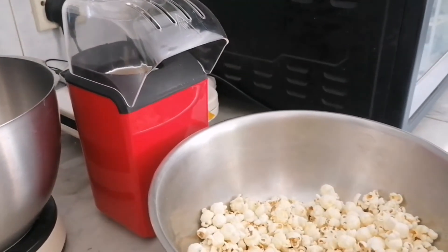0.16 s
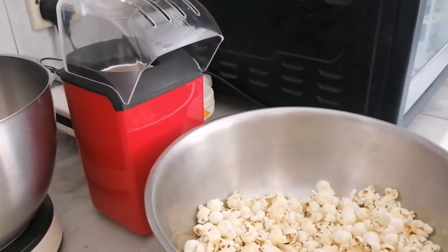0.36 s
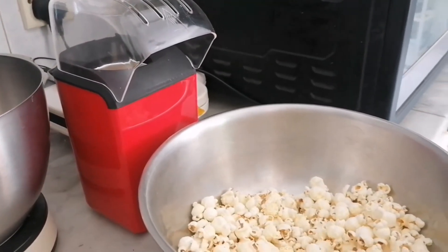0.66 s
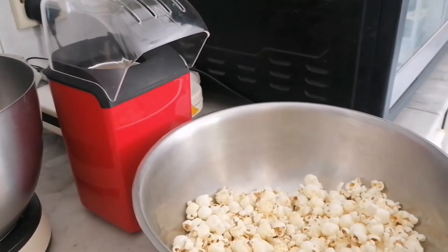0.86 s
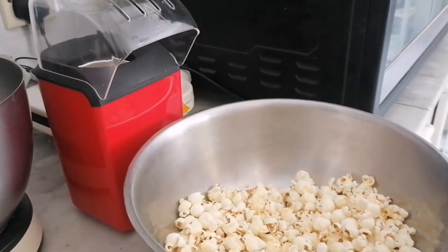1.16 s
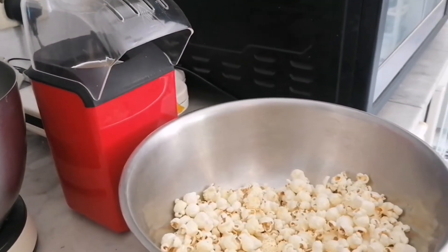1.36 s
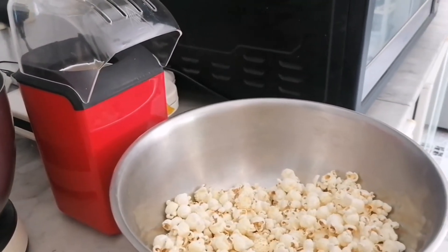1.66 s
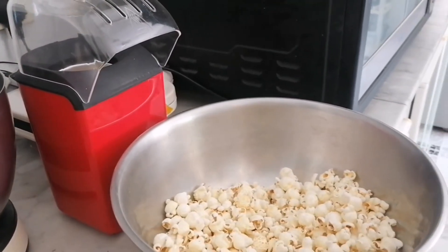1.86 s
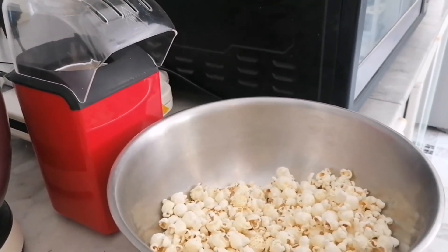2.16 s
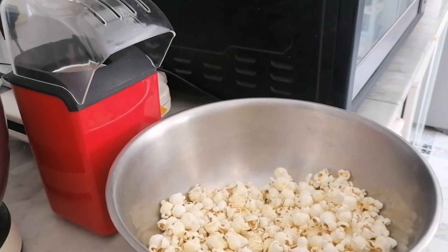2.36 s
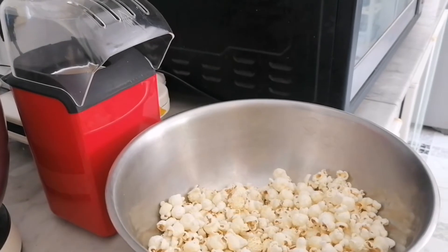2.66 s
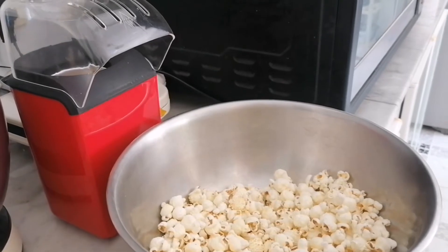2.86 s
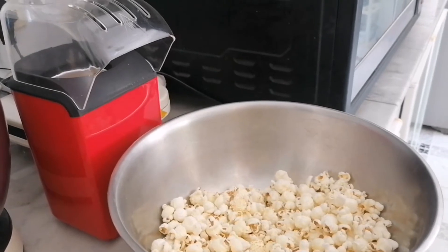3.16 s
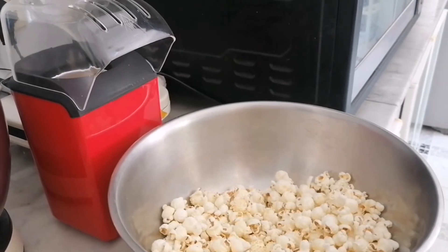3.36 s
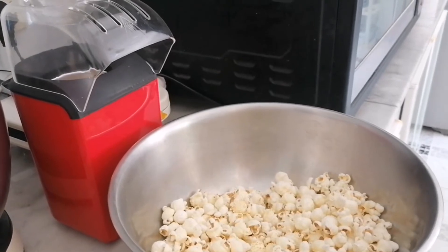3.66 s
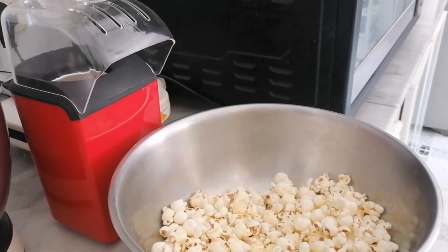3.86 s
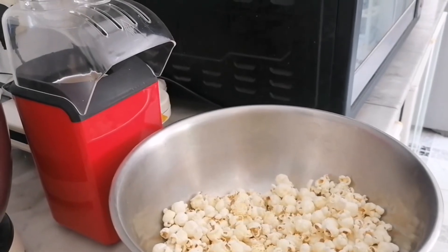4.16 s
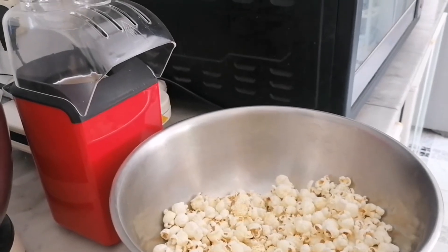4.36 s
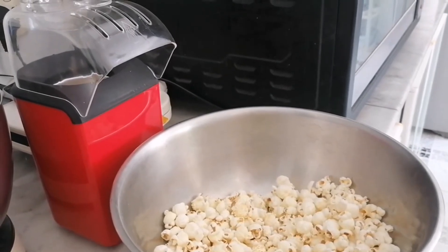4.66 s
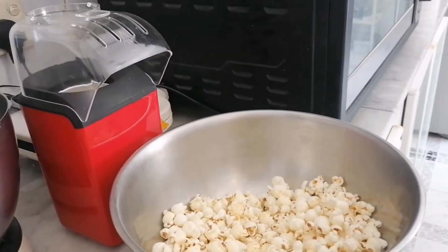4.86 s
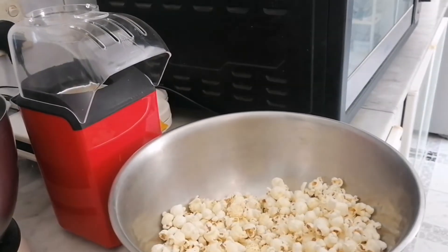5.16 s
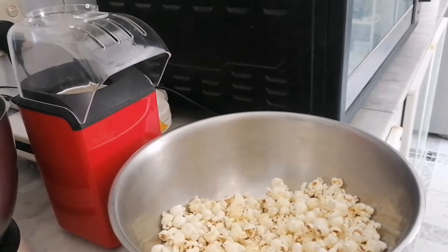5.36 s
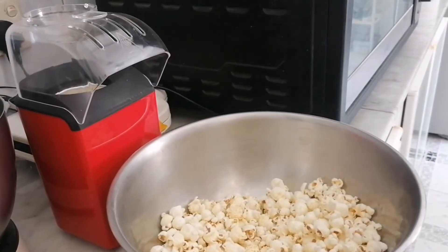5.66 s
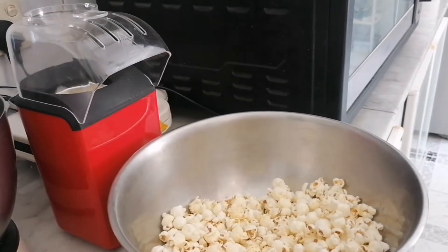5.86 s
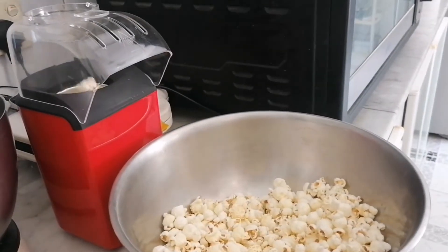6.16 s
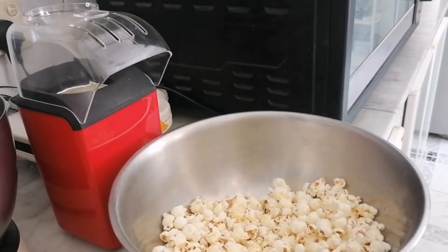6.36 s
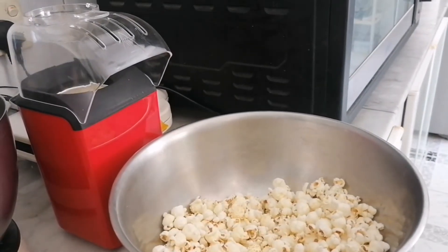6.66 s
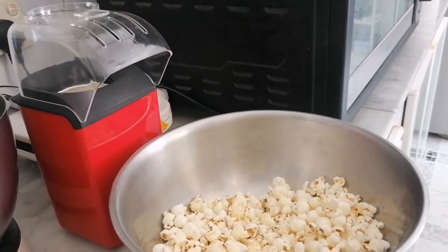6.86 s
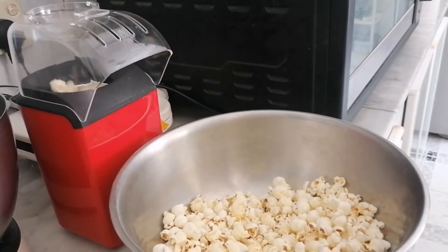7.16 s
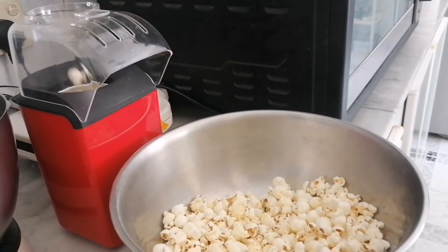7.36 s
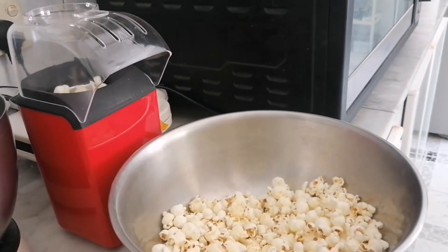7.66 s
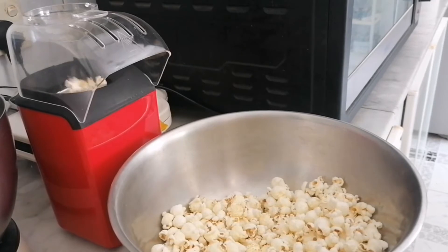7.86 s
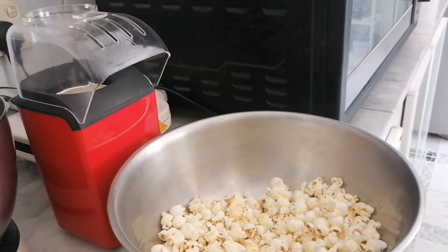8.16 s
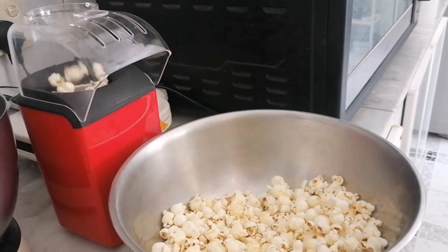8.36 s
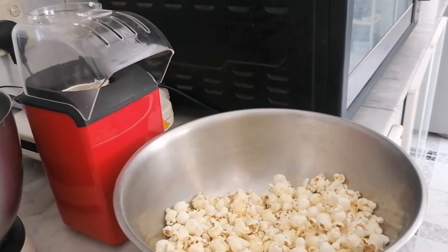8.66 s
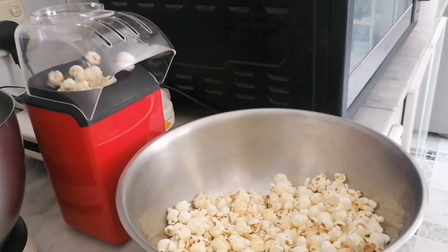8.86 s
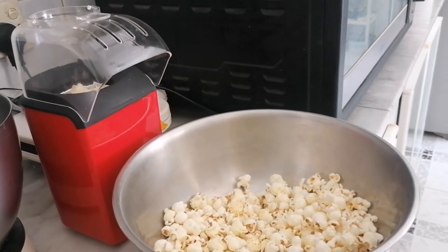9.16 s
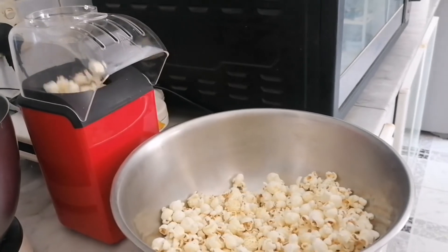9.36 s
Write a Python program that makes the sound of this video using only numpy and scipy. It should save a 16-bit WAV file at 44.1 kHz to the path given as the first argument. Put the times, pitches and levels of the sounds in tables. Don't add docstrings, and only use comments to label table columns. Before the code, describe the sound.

A hot-air popcorn maker roars and hums steadily, drops out briefly midway, then returns with irregular sharp kernel cracks under its plastic hood.

```python
import sys
import numpy as np
from scipy import signal
from scipy.io import wavfile
from scipy.ndimage import uniform_filter1d

SR = 44100
rng = np.random.default_rng(int(sys.argv[2]) if len(sys.argv) > 2 else 0)


def log_audio(samples):
    frames = np.atleast_2d(samples).T
    limited = np.clip(frames, -1, 1)
    pcm = np.round(limited * 32767).astype(np.int16)
    wavfile.write(sys.argv[1], SR, pcm)


def natural_amplitude(level_db):
    exponent = np.asarray(level_db, float) / 20
    return 10 ** exponent


N = 419832
TIME = np.arange(N) / SR
CUT_START_S, CUT_END_S = 4.673, 5.0185
CUT_MID_S = (CUT_START_S + CUT_END_S) / 2


def evened(x):
    return x / np.sqrt(np.mean(x ** 2) + 1e-20)


def read(points, hz):
    f, *columns = np.transpose(points)
    return np.array([np.interp(np.log(hz + 1), np.log(f + 1), c) for c in columns])


def curves(rows):
    s, *columns = np.transpose(rows)
    return np.array([np.interp(TIME, s, c) for c in columns])


def drift(top_hz, t, count):
    hz = np.geomspace(top_hz / 20, top_hz, 12)
    phase_turns = rng.random((count, 12, 1))
    waves = np.sin(2 * np.pi * (hz[:, None] * t + phase_turns)) / np.sqrt(hz)[:, None]
    return evened(waves.sum(1))


def coloured(x, points):
    hz = abs(np.fft.fftfreq(2048, 1 / SR))
    log_gain = np.log(natural_amplitude(read(points, hz)[0]))
    taps = np.fft.ifft(np.exp(np.conj(signal.hilbert(log_gain)))).real[:1024]
    return signal.oaconvolve(x, taps[None] / np.linalg.norm(taps), axes=1)[:, :N]


# f/Hz, left level/dB per Hz, right level/dB per Hz
AIR_ROAR = [(25.3, -87.5, -85.5), (99.5, -82, -82), (169, -74, -76.5), (290, -67, -68.5), (575, -57, -62.5),
            (1075, -63, -65), (1260, -68, -64.5), (2250, -70, -65), (3340, -68.5, -67), (3970, -73, -72),
            (5250, -72.5, -63), (7260, -72, -70.5), (8900, -72, -76), (13900, -84.5, -87)]
# f/Hz, width/Hz, left, right gain/dB before cut, left, right after
HOUSING_MODES = [(44.5, 30, 12.5, 10.5, 3, 2), (394, 29, 2.5, 4, 1.5, 1.5), (1039, 92, 6, 4.5, 4, 8.5),
                 (1170, 90, 2, -4, -1, -7), (1500, 300, 3, 2, 1, -2), (1735, 300, 5, 3.5, 2, 2),
                 (1930, 110, -2, -3, 3, -1), (2130, 120, -3, -2, 0, 0), (2700, 110, -1, -4, 0, 0),
                 (3043, 200, 3, 3.5, 4, 6.5), (3700, 300, -1, 2, -2.5, -1), (3950, 300, -1.5, -2, 1.5, -1),
                 (4450, 500, -1.5, 0, 2, 1.5), (5100, 500, 5.5, 0, 0, 0), (5280, 250, 0, -1.5, 5, 1.5),
                 (5550, 300, 1, 3, -2, -1), (5880, 380, 5, 9, -2, 2.5), (6524, 960, 3.5, 9, 0, 8),
                 (7900, 400, 5, -2, -2, 0), (8500, 700, 0, -8, 0, 3.5), (9200, 950, 9.5, -4, 4, 3),
                 (9750, 400, 4.5, -2, 3, 1), (10340, 1000, 8, 2.5, 3, 4), (10700, 600, 2, 0, -4, -2),
                 (11250, 600, 2, -4, 0, -1), (12200, 1600, 4.5, 4, 1.5, -1), (14750, 1000, 2, 6, 1, 7)]
# f/Hz, left gain/dB, right gain/dB
PHONE_MOVED = [(60, 6.5, 7), (198, -1, -2.5), (400, -4, 2), (1000, -1.5, 0), (2880, -0.5, 0.5),
               (5830, 4, 0.5), (8400, 1, -11.5), (14000, -0.5, -1)]
# f/Hz, likeness/0-1, lead of left port/rad
PORT_LIKENESS = [(40, .93, 0), (150, .86, 0), (254, .9, .19), (400, .8, .35), (640, .7, 1.4), (890, .5, .6),
                 (1140, .6, 1.9), (1400, .55, 1.9), (1700, .5, 2.5), (1850, .9, 3.1), (1920, .9, 3.2),
                 (2010, .3, 3.4), (2150, .12, 4.4), (2420, .5, 5.9), (2700, .3, 8.4), (3700, .2, 6.1),
                 (5100, .4, 5.5), (6000, .45, 9.1), (7500, .1, 11.5)]


def air(patchy_db=1.2, swell_db=0.5, ripple_db=1.1, edge_hz=15140):
    hz, t, (left, other) = signal.stft(rng.standard_normal((2, N)), SR, nperseg=2048, noverlap=1536)
    same, lead_rad = read(PORT_LIKENESS, hz)[:, :, None]
    same = np.clip(same, 0, 1)
    right = same * np.exp(-1j * lead_rad) * left + np.sqrt(1 - same ** 2) * other
    z = np.array([left, right])

    level_db = np.tile(read(AIR_ROAR, hz), (2, 1))
    level_db[2:] += read(PHONE_MOVED, hz)
    for centre_hz, width_hz, *boost_db in HOUSING_MODES:
        level_db += np.outer(boost_db, np.exp(-(2 * (hz - centre_hz) / width_hz) ** 2))
    before = t < CUT_MID_S
    level_db = np.where(before, level_db[:2, :, None], level_db[2:, :, None])
    level_db += 0.6 * np.outer(hz < 480, (t - 2.6) * before)

    patches = uniform_filter1d(rng.standard_normal(left.shape), 8, 0)
    patches = evened(uniform_filter1d(patches, 40, 1))
    ripple = uniform_filter1d(rng.standard_normal(z.shape), size=400, axis=2)
    level_db += ripple_db * evened(uniform_filter1d(ripple, size=3, axis=1))
    level_db = level_db + patchy_db * patches + swell_db * drift(6., t, count=1)
    z *= natural_amplitude(level_db) * (hz < edge_hz)[:, None]
    return np.sqrt(SR / 2) * signal.istft(z, SR, nperseg=2048, noverlap=1536)[1][:, :N]


ORDER_LEAD_RAD = [(1, 0, .1), (2, .5, .7), (3, 1.7, 2.5), (4, 1.5, 1.1), (5, 1.6, -.4), (6, -2.6, 2.5),
                  (7, 2.7, -2.6), (8, -3, -.4), (9, -.7, -.3), (10, 1.8, -.5), (11, -.1, -2.2),
                  (12, -1.6, 1.3)]


def lead(k, shaft_hz):
    if k > len(ORDER_LEAD_RAD):
        return read(PORT_LIKENESS, k * shaft_hz)[1]
    _, before_rad, after_rad = ORDER_LEAD_RAD[k - 1]
    return np.where(TIME > CUT_MID_S, after_rad, before_rad)


# t/s, f/Hz
SHAFT_SPEED = [(0.0, 254.4), (1.3, 254.4), (2.0, 254.1), (2.6, 254.2), (3.8, 253.7), (4.6, 254.0),
               (5.2, 253.3), (6.2, 253.5), (7.3, 253.7), (8.1, 254.3), (9.5, 253.7)]
# multiple, left level/dB, right level/dB before cut, left level/dB, right level/dB after
ORDER_LEVELS = [(1, -32.5, -33, -38.5, -39), (2, -36.5, -43, -38, -40), (3, -40, -48.5, -43, -38),
                (4, -42, -39.5, -39.5, -41.5), (5, -51, -41.5, -48, -52), (6, -45, -40, -60, -48.5),
                (7, -48.5, -48, -45, -43), (8, -56, -49, -51.5, -45.5), (9, -46, -39.5, -54, -57.5),
                (10, -47.5, -47.5, -68, -50), (11, -57, -49, -58, -55), (12, -50.5, -47, -59, -48),
                (13, -58, -45.5, -66, -54), (17, -58, -50, -70, -52.5), (18, -70, -48, -70, -64),
                (19, -58, -53, -60, -50), (20, -55, -45, -66, -60), (21, -66, -44.5, -64, -51),
                (22, -66, -58, -62, -49), (23, -50, -43, -70, -56), (24, -65, -49, -64, -57),
                (25, -53, -57, -68, -55), (26, -58, -48, -70, -66), (27, -61, -51, -72, -68)]
# centre t/s, half-width/s, multiple, gain/dB
ORDER_SWELLS_BEFORE = [(0, .3, 1, -5), (.3, .5, 2, 9), (1.45, .3, 2, -4), (4.1, .6, 2, 2.5),
                       (3.6, .9, 3, 5), (1.2, .25, 4, 3.5), (2.9, .8, 4, -6), (.1, .4, 5, 8),
                       (1.4, .6, 5, -8), (3.6, .7, 5, 7), (1.6, .4, 6, -6), (.55, .4, 7, 10),
                       (.8, .6, 9, 4), (2.1, .3, 9, -5), (3.07, .12, 9, 7), (4.2, .7, 9, -9),
                       (.8, 1.3, 11, 6), (0, .3, 12, 6), (1.6, .3, 12, 5), (3.9, .8, 12, -9),
                       (3.0, .3, 13, 6), (2.9, .25, 10, 2), (2.9, .3, 12, 4), (.2, .3, 1, 1.5),
                       (1.6, .35, 3, 5), (3.5, .35, 4, -5), (1.4, .5, 5, 5), (4, .6, 5, -3),
                       (.4, .4, 6, -6), (3.45, .25, 10, -6), (4, .5, 9, 3), (.2, .3, 7, -4)]
ORDER_SWELLS_AFTER = [(5.3, .4, 1, -4), (5.8, .2, 2, 5), (6.45, .3, 2, 5), (6.9, .25, 2, -5),
                      (7.45, .3, 2, 5), (9.45, .3, 2, 4), (8.2, .8, 3, -8), (7.35, .15, 4, 4),
                      (7.75, .2, 4, -5), (8.14, .12, 4, 7), (8.32, .05, 4, -8), (8.55, .2, 4, 6.5),
                      (6.9, .3, 4, -3), (9.4, .4, 4, 7), (5.6, .6, 5, -10), (6.7, .35, 5, 8),
                      (7.8, .8, 5, 7), (9.45, .2, 5, 6), (8.4, .4, 6, 6), (5.6, .6, 7, -6),
                      (6.75, .45, 7, 7), (6.7, .5, 8, 4), (6.85, .3, 9, 11), (7.75, .2, 9, 6),
                      (8.8, .25, 9, -7), (7.8, .15, 12, 11), (8.2, .3, 12, 11), (9.3, .4, 12, 12),
                      (6.75, .25, 2, 4), (7.7, .5, 3, 5), (7.6, .55, 4, 5), (8.8, .15, 4, 3),
                      (5.9, .4, 5, 5), (6.8, .4, 5, -3), (6.4, .15, 7, -6), (6.4, .6, 8, -4), (9, .5, 8, 4),
                      (7.55, .15, 12, -6), (8.4, .4, 4, 3), (6.9, .3, 12, 6), (6.9, .3, 11, 6),
                      (5.9, .3, 4, -2)]


def motor(waver_db=2.5, steady_db=1.0, flutter_hz=.12):
    coarse = TIME[::256]
    flutter = np.interp(TIME, coarse, drift(12., coarse, count=1)[0])
    speed_hz = curves(SHAFT_SPEED)[0] + flutter_hz * flutter
    turns = np.cumsum(speed_hz) / SR
    sway_db = {}
    for s, half_s, k, db in [*ORDER_SWELLS_BEFORE, *ORDER_SWELLS_AFTER]:
        swell_db = db * np.exp(-((coarse - s) / half_s) ** 2)
        sway_db[round(k)] = sway_db.get(round(k), 0) + swell_db
    after = coarse > CUT_MID_S
    out = np.zeros((2, N))
    for k, *db in ORDER_LEVELS:
        k = round(k)
        chance_db = steady_db if k in sway_db else waver_db
        level_db = np.where(after, np.c_[db[2:]], np.c_[db[:2]])
        level_db = level_db + chance_db * drift(3.7, coarse, count=2) + sway_db.get(k, 0)
        level = np.array([np.interp(TIME, coarse, g) for g in natural_amplitude(level_db)])
        lag_turns = np.c_[[0, 1]] * lead(k, speed_hz[0]) / (2 * np.pi)
        out += np.sqrt(2) * level * np.sin(2 * np.pi * (k * turns - lag_turns + rng.random()))
    return out


# t/s, peak level/dB, body re top/dB, left-right/dB, tear/ms
KERNEL_CRACKS = [(5.3388, -31.5, -5, 8, 2), (5.3857, -19, -10, 10, 1.2), (5.3945, -27, -5, 15, 1.8),
                 (5.3995, -33, -5, 12, 1.5), (5.5414, -39, 0, 9, 2.05), (5.5502, -25.5, -9, 7, 1.3),
                 (5.61, -32.5, -2, 11, 2.5), (6.0403, -31, 1, 1, 3), (6.0475, -42, 11, 2, 1.2),
                 (6.0535, -42, 14.5, 2, 1), (6.1638, -20.5, -12, 3, 1.2), (6.172, -30, 0, 8, 2),
                 (6.1765, -36, 3, 1, 1), (6.5158, -28, -1.5, 8, 2.7), (6.5275, -38, 6, 3, 1.9),
                 (6.5364, -36, -1, 4.5, 2), (7.0735, -29, -7, 8, 4), (7.0768, -22.5, -8, 10, 2.5),
                 (7.082, -32, -7, 8, 3), (7.0938, -27, -5, 7, 1), (7.1034, -20.5, -11, 6, 1.6),
                 (7.2003, -19.5, -6, 12, .6), (7.2038, -22, -7, 7, 2), (7.5317, -30.5, 4, 10, 2.5),
                 (7.7425, -28, -13.5, 7, 2.5), (7.9065, -34, -5, 5, 2), (7.9088, -18, -11, 9, 1),
                 (7.9106, -25, -8, 10, 1.3), (7.9168, -34, 3, 3, 4), (8.2937, -27.5, -6, 10, 2),
                 (8.766, -33, -11, 10, 4), (8.7685, -30, -7, 12, 2), (8.7708, -23, -4, 14.5, 2),
                 (8.7775, -26.5, -5, 11, 1.6), (8.9464, -19.5, -3, 18, 1.8), (8.9525, -27.5, 1, 11, 3.5),
                 (9.0357, -28.5, -6, 16, 1.5), (9.368, -36, -6, 6, 3.2), (9.3722, -29, -8, 11, 3.6)]
# t/s, peak level/dB
FAINT_CRACKS = [(5.1583, -37), (5.5044, -35), (6.2175, -34), (7.1611, -32), (7.9416, -29), (8.303, -40),
                (8.4008, -36), (8.4054, -33), (8.4194, -42), (8.523, -36), (8.7864, -37), (8.7954, -36),
                (9.407, -34)]


def bursts():
    ticks = [(s, db, -9, 10, 1.5) for s, db in FAINT_CRACKS]
    return [*KERNEL_CRACKS, *ticks]


# f/Hz, gain/dB
CRACK_TOP_GAIN = [(6000, -15.5), (8000, -1), (9500, 4.5), (10800, -0.5), (12000, -8.5), (14000, -24)]
# f/Hz, gain/dB
CRACK_BODY_GAIN = [(300, -13), (2000, -27.5), (4000, -16), (5000, 2.5), (6000, 8), (7500, -3),
                   (9000, -21.5)]
# f/Hz, gain/dB
CRACK_SNAP_GAIN = [(9000, -34.5), (11500, 10.5), (13000, -2.5), (15000, 2.5), (15800, 3), (16200, -47)]
# t/s, left gain/dB, right gain/dB
REST_GAIN = [(0.0, -1, -1), (2.5, -1, 0), (4.67, -2, -2.5), (5.02, -5, -7), (5.4, -4.5, -5.5),
             (5.75, -4, 2.5), (6.03, -3.5, 2.5), (6.3, -4.5, 2.5), (6.5, 1, 5.5), (6.75, 1.5, 3.5),
             (6.88, 5.5, 3), (7.05, 3.5, 1.5), (7.25, -2.5, 3), (7.5, -2, -2), (7.9, -3, -3.5),
             (8.45, -5.5, -10.5), (8.9, -5, -7.5), (9.52, -9.5, -8)]


def pops(ragged_db=2.5, rattle_db=-13, rattle_s=0.011, snap_db=-13, snap_slope=0.4):
    length, onset = 3500, 22
    rise_ms, right_late = 0.5, 24
    ms = 1000 * np.arange(length) / SR
    top, body, snap = np.zeros((3, 2, N + length))
    lean_db = -10 + 0.87 * np.subtract(*curves(REST_GAIN))
    events = bursts()
    chance = 1.3 * np.tanh(rng.standard_normal((len(events), 5, length)))
    chance[:, :4, onset] = 5
    for (s, db, body_db, pan_db, tear_ms), (*noise, tear) in zip(events, chance):
        rise = np.minimum(ms / rise_ms, 1) ** 2
        tearing = 1.21 * np.exp(-ms / (1.87 * tear_ms))
        rattle = natural_amplitude(rattle_db) * np.exp(-ms / (1000 * rattle_s))
        shape = rise * (tearing + rattle)
        shape *= natural_amplitude(ragged_db * evened(uniform_filter1d(tear, 40)))
        start = round(s * SR) - onset
        at = slice(start, start + length)
        top_db = db + np.c_[[pan_db / 2, -pan_db / 2]]
        low_db = db + body_db + np.c_[[lean_db[start] / 2, -lean_db[start] / 2]]
        top[:, at] += natural_amplitude(top_db) * shape * noise[:2]
        body[:, at] += natural_amplitude(low_db) * shape * noise[2:]
        snap[:, at] += natural_amplitude(db + snap_db + snap_slope * (db + 33.0)) * shape * noise[:2]
    burst = natural_amplitude(-3.5) * coloured(top, CRACK_TOP_GAIN)
    burst += natural_amplitude(2.0) * coloured(body, CRACK_BODY_GAIN)
    burst += coloured(snap, CRACK_SNAP_GAIN)
    burst = np.array([burst[0], np.roll(burst[1], right_late)])
    return 0.46 * np.tanh(burst / 0.59)


# t/s, level/dB
PUFFS = [
    (5.35, -55),
    (6.164, -49),
    (6.521, -46.5),
    (7.2, -40),
    (7.909, -31.5),
    (8.772, -41),
    (8.946, -34),
]


def thumps(push_s=0.0011, settle_s=.015):
    out = np.zeros(N)
    u = TIME[:SR // 4]
    push = u / push_s ** 2 * np.exp(1 - u / push_s)
    rebound = u / settle_s ** 2 * np.exp(1 - u / settle_s)
    for s, db in PUFFS:
        out[round(s * SR):][:len(u)] -= natural_amplitude(db) * push_s * (push - rebound)
    return out


def knock(start_s=5.28, length_s=.1, hz=440, width_hz=150, db=-38):
    noise = signal.lfilter(*signal.iirpeak(hz, hz / width_hz, SR), rng.standard_normal(N))
    swell = np.sin(np.pi * np.clip((TIME - start_s) / length_s, 0, 1))
    return natural_amplitude(db) * evened(noise) * swell


# f/Hz, t60/s
ROOM_T60 = [(500, 0.41), (4000, 0.46), (9000, 0.61), (13500, 0.3), (15500, 0.088)]


def kitchen(x):
    taps = np.zeros((2, SR // 2))
    at = np.arange(300, SR // 2 - 20, 20) + rng.integers(0, 20, (2, (SR // 2 - 301) // 20))
    np.put_along_axis(taps, at, rng.choice([-1., 1.], at.shape), 1)
    hz, t, z = signal.stft(taps, SR, nperseg=256)
    decay = natural_amplitude(-60 * t / read(ROOM_T60, hz)[0][:, None])
    tail = signal.istft(z * decay, SR, nperseg=256)[1]
    return signal.fftconvolve(x, tail / np.linalg.norm(tail[0]), axes=1)[:, :N]


# t/s, left drop/dB, right drop/dB, treble share/0-1
GAIN_DROPS = [(5.377, 5.5, 7.5, 0.74), (5.542, 5, 6, 0.76), (6.047, 7.5, 2.5, 0.6), (6.158, 4.5, 12, 0.77),
              (6.507, 3, 4, 0.77), (7.105, 3.5, 4.5, 1), (7.2014, 9.5, 16.5, 0.62), (7.525, 1, 3, 0.6),
              (7.901, 16.5, 17, 0.43), (8.288, 0.5, -1.5, 0.29), (8.763, 8, 5.5, 0.9),
              (8.938, 11, 8.5, 0.3), (9.368, 1.5, 2, 0.2)]


def drops(recover_s, treble):
    out = np.zeros((2, N))
    for s, *drop_db, share in GAIN_DROPS:
        at = round(s * SR)
        fading = np.exp(-(TIME[:min(SR, N - at)] / recover_s) ** 1.32)
        out[:, at:at + SR] += np.c_[drop_db] * fading * (share if treble else 1)
    return uniform_filter1d(out, size=170)


def ducked(x, split_hz=3050, foresight_s=0.0045, start_db=-25, depth=0.32):
    bass = signal.oaconvolve(x, signal.firwin(63, split_hz, fs=SR)[None], "same")
    rest_db = curves(REST_GAIN)
    after = TIME > CUT_MID_S
    bass_db = rest_db - drops(0.18, False)
    treble_db = rest_db - drops(0.29, True)
    treble_db += np.where(after, np.c_[[-5.5, -1.83]], np.c_[[2, 0.00074]])
    treble_db += np.c_[[-0.53, 0]] * (TIME - after * CUT_END_S)
    for s, db, *_ in KERNEL_CRACKS:
        treble_db[:, round((s - foresight_s) * SR):round(s * SR)] -= depth * max(db - start_db, 0)
    return natural_amplitude(bass_db) * bass + natural_amplitude(treble_db) * (x - bass)


def scene():
    cracks = pops()
    return ducked(air() + motor()) + cracks + natural_amplitude(-13.0) * kitchen(cracks) + thumps() + knock()


# f/Hz, drop threshold re band/dB, share of bands dropped/0-1
THINNING = [(300, -24, 0), (1650, -13, 0), (1950, -9, .04), (2300, -12, 0), (3900, -8, .06), (5000, -18, 0),
            (7500, -9, .07), (9000, -13, 0), (10500, -7, .13), (11500, -3, .24), (13000, -1, .33),
            (15000, -2, .22)]


def thinned(x, size=1024, grid=54, crest_db=17, edge_hz=15900):
    n, k = np.arange(2 * size), np.arange(size)
    window = signal.windows.kaiser_bessel_derived(2 * size, 4 * np.pi)
    cosines = np.cos(np.pi / size * np.outer(n + .5 + size / 2, k + .5))
    basis = np.sqrt(2 / size) * window[:, None] * cosines
    padded = np.pad(x, ((0, 0), (2 * size - grid, 2 * size)))
    starts = np.arange(0, padded.shape[1] - 2 * size + 1, size)
    frames = padded[:, starts[:, None] + n]
    z = np.tensordot(frames, basis, 1)
    hz = (k + .5) * SR / (2 * size)

    under_db, share = read(THINNING, hz)
    band = np.sqrt(abs(uniform_filter1d(z ** 2, size=24, axis=2)))
    luck = rng.random((z.shape[1] // 2 + 1, size // 4))
    luck = luck.repeat(2, axis=0).repeat(4, axis=1)[:z.shape[1]]
    treble = np.diff(frames, 2, axis=2) ** 2
    crack = treble.max(2) > natural_amplitude(2 * crest_db) * treble.mean(2)
    keep = (abs(z) > natural_amplitude(under_db) * band) & (luck > share) | crack[..., None]
    rebuilt = np.tensordot(z * keep * (hz < edge_hz), basis.T, 1)
    first, second = np.split(rebuilt, 2, axis=2)
    return (second[:, :-1] + first[:, 1:]).reshape(2, -1)[:, size - grid:][:, :N]


def band_limit(x):
    return signal.sosfilt(signal.butter(12, 16490, fs=SR, output="sos"), x)


def record(dry):
    fade_out = natural_amplitude(-14.5 - 3200 * np.maximum(TIME - CUT_START_S, 0))
    in_cut = (TIME >= CUT_START_S) & (TIME < CUT_END_S)
    gate = uniform_filter1d(np.where(in_cut, fade_out, 1), size=30)
    return band_limit(thinned(dry) * gate)


dry = scene()
out = record(dry)
log_audio(out)
```